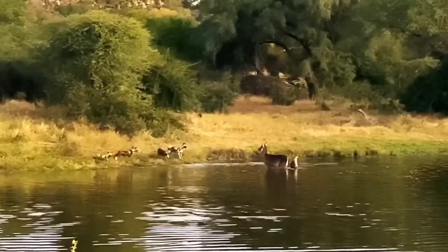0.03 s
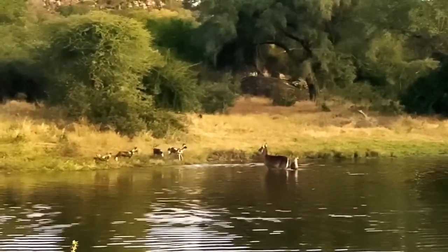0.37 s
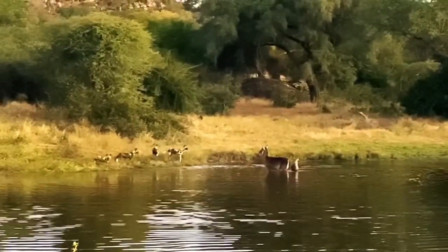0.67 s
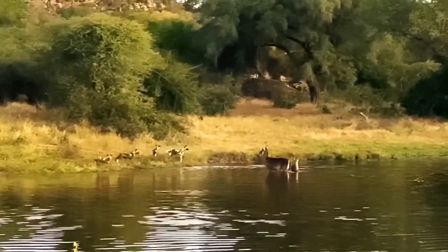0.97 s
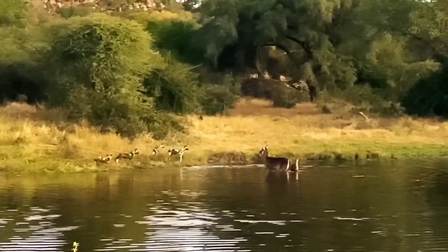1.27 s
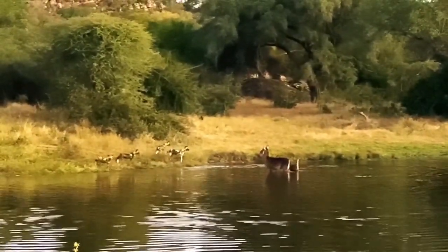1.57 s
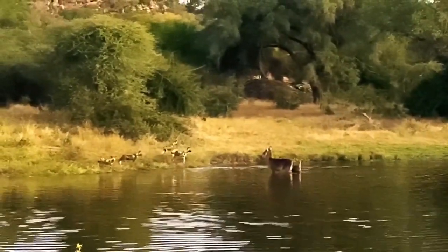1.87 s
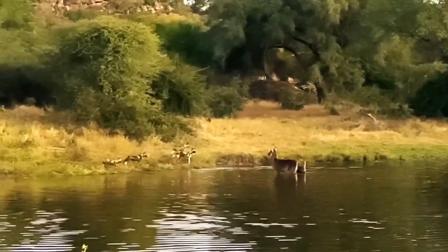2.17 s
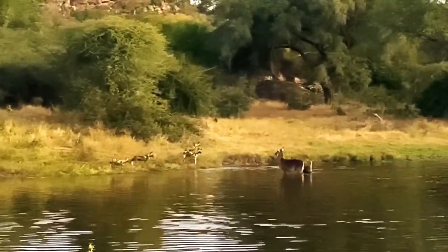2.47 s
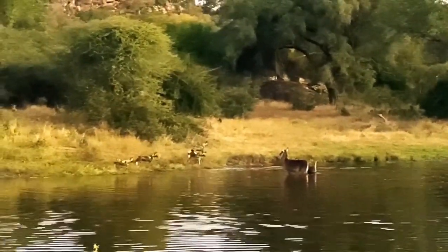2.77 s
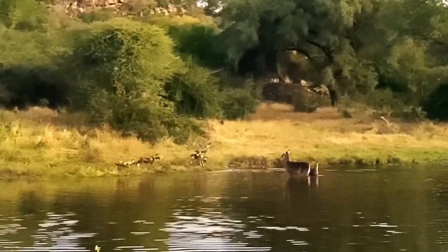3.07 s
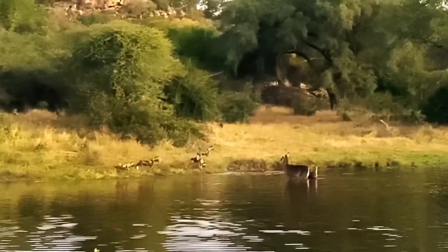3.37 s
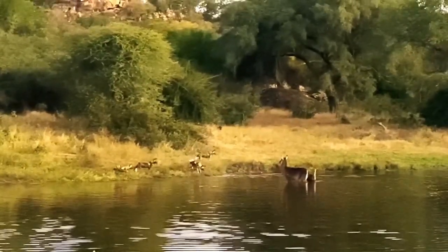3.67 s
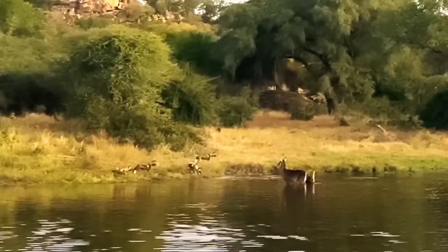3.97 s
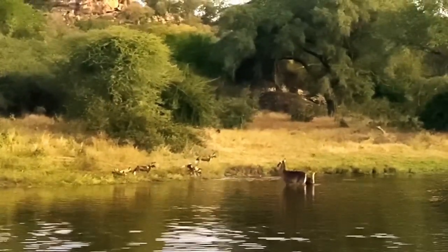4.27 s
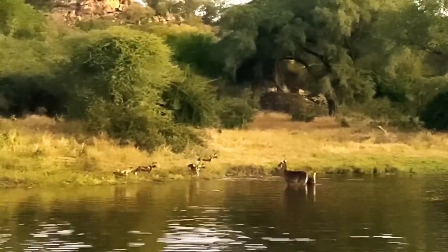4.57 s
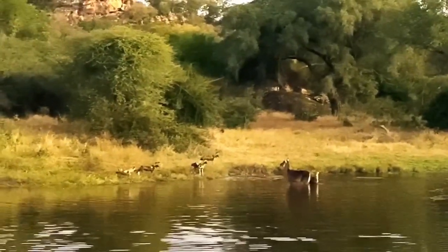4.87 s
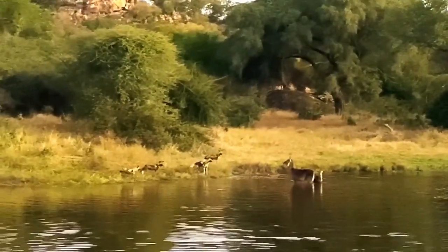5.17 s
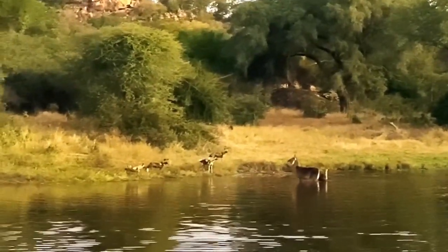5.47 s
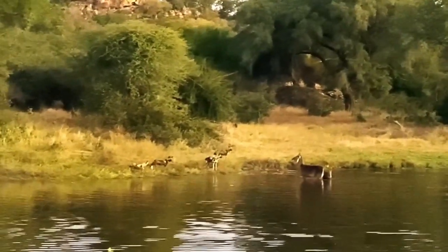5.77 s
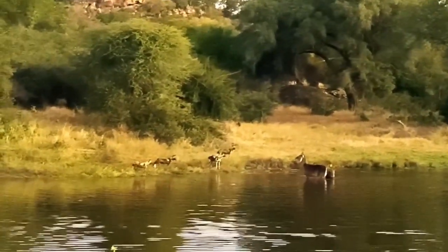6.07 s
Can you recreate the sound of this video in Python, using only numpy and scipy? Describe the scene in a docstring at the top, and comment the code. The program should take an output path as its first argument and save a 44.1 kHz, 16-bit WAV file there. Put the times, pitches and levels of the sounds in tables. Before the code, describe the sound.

Close crickets chirp for the whole six seconds or so, straight ahead on an evening river bank. Each high chirp is a quick run of pulses lasting about a quarter of a second, and they overlap unevenly. A softer cricket chorus forms a steady band behind them.

Everything else is very faint. Lower, slower insect chirps recur in the distance, and a thin, even trill runs from about 1 to 4 seconds. A distant bird gives husky rising whistles between 1.5 and 3 seconds. Raspy bird chatter comes around 3.7 and 6 seconds, with two short pips just after 4. Tiny, very high insect buzzes appear near 1.2 and 5.3 seconds. A low breeze rises slightly around 1.5 seconds, with fine hiss and gently lapping water. Soft knocks and gulps are scattered throughout, clustering near 2.6 seconds. The trees add a slight, short echo.

```python
"""Crickets chirp over one another close to the microphone, on a river bank in the evening.
Each wing stroke is a whistle that falls as the scraper slows along the file; strokes slow as a chirp ends.
Further off are more crickets, lower insects, a thin trill, high buzzes and small birds. A faint breeze
rumbles underneath, with lapping water, a few soft knocks and a short echo from the trees.
Aliasing adds faint ghost copies of the chirps above and below their pitch."""
import sys
import numpy as np
from scipy import signal
from scipy.fft import rfft, irfft, next_fast_len
from scipy.io import wavfile
from scipy.ndimage import map_coordinates

SR = 44100
rng = np.random.default_rng(int(sys.argv[2]) if len(sys.argv) > 2 else 0)


def unload_wav(signal):
    """Save mono or channel-first audio to the path in sys.argv[1] as 16-bit WAV at rate SR, clipped to [-1, 1]."""
    wavfile.write(
        sys.argv[1],
        SR,
        np.round(np.clip(np.atleast_2d(signal).T, -1, 1) * 32767).astype(np.int16),
    )


N = 278989


def add_chirp(track, s, strokes, first_gap_ms, db, spread_hz=30, last_gap_ms=29.25, slowing=1.15):
    """One chirp: the scraper slows along the file, so each stroke falls in pitch; the gaps widen too."""
    # one wing stroke: from_middle_ms, pitch_hz, level_db
    stroke = [(-10.5, 6820, -34), (-8, 6520, -17), (-5.5, 6220, -5.5), (-2.5, 5940, -3), (0, 5710, 0),
              (3.5, 5500, 0.84), (7, 5291, -5.5), (9, 5017, -15), (12.5, 4680, -34)]
    ms, pitch_hz, shape_db = np.transpose(stroke)
    t_ms = np.arange(ms[0], ms[-1], 1000 / SR)
    progress = np.linspace(0, 1, strokes - 1)
    gaps_s = (first_gap_ms + (last_gap_ms - first_gap_ms) * progress ** slowing) / 1000
    onsets = s + ms[0] / 1000 + np.r_[0, np.cumsum(gaps_s)]
    glide_hz = np.interp(t_ms, ms, pitch_hz) + spread_hz * rng.normal()
    for k, at in enumerate(onsets):
        stroke_db = db + 1.24 * rng.normal() - (k == 0)  # the first stroke is 1 dB softer
        # uneven teeth roughen the loudness and pitch
        rough_db = np.interp(t_ms, ms, shape_db) + 1.58 * wobble(700, len(t_ms))
        rough_hz = glide_hz + 45 * wobble(900, len(t_ms))
        add(track, at, amp(stroke_db + rough_db) * tone(rough_hz))


def near_crickets():
    """The crickets closest to the microphone rub their wings in overlapping chirps."""
    # chirps: first_stroke_middle_s, stroke_count, first_gap_ms, level_db
    chirps = [(-0.0654, 9, 26.4, -45.5), (0.1756, 10, 23.0, -42.5), (0.218, 9, 21.6, -45.0),
              (0.303, 13, 25.6, -45.0), (0.5894, 9, 23.2, -44.0), (0.6056, 9, 23.2, -45.0),
              (0.7404, 13, 25.4, -45.5), (0.9884, 9, 22.8, -43.0), (1.026, 10, 22.8, -45.0),
              (1.2524, 14, 26.6, -45.5), (1.396, 7, 22.2, -42.5), (1.4454, 9, 22.6, -44.0),
              (1.7106, 9, 23.0, -43.5), (1.7496, 13, 25.2, -46.0), (1.857, 8, 21.8, -44.0),
              (2.1347, 9, 23.8, -43.5), (2.2004, 14, 25.8, -45.0), (2.518, 10, 23.2, -43.5),
              (2.5388, 12, 22.6, -45.5), (2.7196, 5, 26.0, -45.5), (2.9776, 11, 24.0, -43.0),
              (2.9924, 8, 24.4, -43.0), (3.3438, 13, 23.8, -43.5), (3.3772, 11, 25.2, -46.5),
              (3.7538, 9, 22.8, -45.5), (3.785, 12, 25.6, -46.5), (3.874, 10, 23.0, -44.0),
              (4.1414, 10, 23.4, -44.5), (4.2324, 11, 25.0, -45.5), (4.3152, 8, 22.8, -43.0),
              (4.5665, 9, 23, -45.0), (4.6578, 12, 25.2, -46.0), (4.7328, 10, 23.2, -42.0),
              (4.951, 8, 23.6, -45.5), (5.0968, 11, 25.2, -46.5), (5.2334, 10, 22.2, -43.5),
              (5.3272, 9, 22.6, -45.5), (5.5156, 11, 25.2, -46.0), (5.6684, 8, 26.4, -43.5),
              (5.7472, 20, 25.4, -45.5), (6.031, 10, 23.6, -43.5), (6.1452, 15, 26.2, -45.5)]
    track = np.zeros(N)
    for row in chirps:
        add_chirp(track, *row)
    return track


def far_crickets(count=4, period_s=.6, level_db=-56, blur_db=-64):
    """More of the same kind further off, the furthest blurred into a steady band."""
    # spectrum of the furthest crickets: frequency_hz, relative_db
    chorus = [(3000, -75.5), (4300, -39), (4800, -26.5), (5250, -7.5), (5650, -1.5), (6200, -0.5),
              (6550, -24), (6900, -13.5), (7400, -22.5), (7800, -60)]
    track = np.zeros(N)
    for _ in range(count):
        for s in np.arange(-period_s, N / SR, period_s) + rng.uniform(0, period_s):
            add_chirp(track, s + rng.normal(0, .04), strokes=14, first_gap_ms=23,
                      db=level_db + rng.normal(0, 1.5), spread_hz=90)
    return track + amp(blur_db) * rush(chorus, narrow_db=-17)


def slow_insects(chirp_s=.53, strokes_per_s=17.5, stroke_s=.034, fall_hz=720, rough_hz=50):
    """Distant, lower chirps of well separated, uneven falling strokes, a little softer at each end."""
    # chirps: start_s, pitch_hz, level_db
    chirps = [(.32, 4170, -80), (.72, 3575, -76), (1.45, 4160, -78.5), (1.88, 3600, -76),
              (2.661, 4200, -80), (3.48, 3600, -80), (3.78, 4240, -80), (4.3, 3670, -86.5),
              (4.92, 4150, -81), (4.93, 3575, -79.5), (5.78, 4190, -81)]
    track = np.zeros(N)
    u = np.linspace(0, 1, int(stroke_s * SR))
    for start, hz, db in chirps:
        times = start + np.arange(0, chirp_s, 1 / strokes_per_s)
        swells = np.hanning(len(times) + 2)[1:-1] ** .098
        for s, swell in zip(times, swells):
            glide_hz = hz + fall_hz * (.5 - u) + rough_hz * wobble(500, len(u)) + 35 * rng.normal()
            envelope = amp(db + 1.9 * rng.normal()) * swell * np.sin(np.pi * u) ** 2
            stroke = envelope * tone(glide_hz)
            add(track, s - stroke_s / 2 + .003 * rng.normal(), stroke)
    return track


def thin_trill(start_s=.96, end_s=4.11, ramp_s=.09, pitch_hz=4622, sag_hz_per_s=10, level_db=-72.5):
    """A tree cricket trills evenly; it sounds softer and flat while its effort builds and dies away."""
    t = np.arange(N) / SR
    effort = np.clip(np.minimum(t - start_s, end_s - t) / ramp_s, 0, 1)
    centre_hz = pitch_hz - sag_hz_per_s * (t - start_s) - 220 * (1 - effort)
    strokes_per_s = 32.5 + .19 * wobble(3.7)
    stroke_phase = np.cumsum(strokes_per_s) / SR % 1
    glide_hz = centre_hz + 170 * (.5 - stroke_phase) + 12 * wobble(200)  # each stroke falls and wavers
    return amp(level_db) * np.sqrt(effort) * np.sin(np.pi * stroke_phase) ** 2 * tone(glide_hz)


def bird_note(length_s, hz, slide_hz, db, arch_hz=0, rasp_hz=0):
    """One bird note that swells and fades while its pitch slides, arches and shakes."""
    u = np.linspace(0, 1, int(length_s * SR))
    swell = np.sin(np.pi * u)
    return amp(db) * swell * tone(hz + slide_hz * u + arch_hz * swell + rasp_hz * wobble(600, len(u)))


def birds():
    """Small birds in the distance give husky rising whistles, short arched pips and raspy chatter."""
    # one bird's repeated whistle: start_s, level_db
    whistles = [(1.506, -81.5), (1.96, -79.5), (2.75, -81), (3.13, -90)]
    # pips: start_s, pitch_hz, level_db
    pips = [(4.13, 2160, -76.5), (4.332, 2286, -68)]
    # chatter notes: start_s, length_s, pitch_hz, slide_hz, level_db
    chatter = [(0.026, 0.033, 3090, -1, -73), (3.617, .1, 3410, -250, -73), (3.73, 0.11, 3360, -400, -75),
               (3.798, 0.11, 3230, 496, -76.5), (5.77, .08, 3820, -300, -80),
               (6.03, 0.093, 3770, -330, -80), (6.18, .1, 3800, -380, -76.5)]
    track = np.zeros(N)
    for s, db in whistles:
        add(track, s, bird_note(length_s=.18, hz=3060, slide_hz=1120, db=db, rasp_hz=150))
    for s, hz, db in pips:
        add(track, s, bird_note(length_s=.038, hz=hz, slide_hz=0, db=db, arch_hz=145, rasp_hz=25))
    for s, *note in chatter:
        add(track, s, bird_note(*note, rasp_hz=218))
    return track


def knocks():
    """Soft knocks close by, each a quick slide in pitch, mostly downwards; the lower, the longer."""
    # knocks, ticks and gulps: start_s, first_hz, last_hz, level_db
    slides = [(.274, 700, 327, -70.5), (1.635, 132, 59.94, -73), (2.028, 387, 110, -67.5),
              (2.593, 472, 400, -72.5), (2.647, 1320, 196, -70.5), (2.652, 148, 60, -67.5),
              (2.67, 387, 60, -64), (2.79, 1650, 1140, -72), (3.25, 220, 70, -67.5), (4.43, 380, 430, -74),
              (4.658, 1600, 297, -69.5), (5.595, 386, 69, -68), (5.85, 150, 79, -67.5),
              (6.019, 1374, 258, -70.5)]
    track = np.zeros(N)
    for s, first_hz, last_hz, db in slides:
        length_s = .024 * (400 / first_hz) ** .55
        u = np.linspace(0, 1, int(length_s * SR))
        glide_hz = first_hz * (last_hz / first_hz) ** u
        add(track, s, amp(db) * np.sin(np.pi * u) * tone(glide_hz))
    return track


def high_buzzes(strokes_per_s=55):
    """A small insect rasps in short bursts, pitched far above the crickets."""
    # bursts: start_s, length_s, level_db
    bursts = [(1.19, 0.35, -88), (4.478, 0.044, -91), (5.27, .13, -88), (5.576, .06, -88)]
    # spectrum of the rasp: frequency_hz, relative_db
    band = [(11000, -39.5), (12300, -6), (13000, -3), (13600, -3), (14800, -26.5)]
    effort = np.zeros(N)
    for s, length_s, db in bursts:
        add(effort, s, amp(db) * signal.windows.tukey(int(length_s * SR), .4))
    strokes = unit(np.sin(np.pi * strokes_per_s * np.arange(N) / SR) ** 2)
    return effort * strokes * rush(band, narrow_db=-3)


def breeze_and_water(water_db=-84, water_follows=.4, ripple_db=1.16, hiss_db=-83):
    """A breeze rises, rumbles and stirs the river, which laps in small waves; a fine hiss lies over it."""
    # strength of the breeze's rumble: time_s, level_db
    breeze = [(0.0, -78.5), (0.12, -87), (1.11, -86), (1.64, -77.5), (6.2, -78), (6.33, -80.5)]
    # small waves: crest_s, length_s, rise_db
    waves = [(1.95, 0.78, 5), (2.62, .3, 4), (4.55, 0.5, 7)]
    # spectrum of the breeze: frequency_hz, relative_db
    rumble = [(15, -40), (25, -17.5), (40, -7), (59, 2.5), (85, -3), (130, -7), (220, -14.5), (300, -43)]
    # spectrum of the lapping: frequency_hz, relative_db
    water = [(100, -14), (190, 0), (300, -0.5), (500, -5), (800, -13), (1200, -19.5), (2500, -21.5),
             (5000, -61)]
    # spectrum of the hiss: frequency_hz, relative_db
    hiss = [(100, -8), (600, 3), (1300, -3), (2000, 3), (2900, -8), (4000, -0.5), (7000, -6.5), (8000, -16),
            (12500, -12), (14500, -23.5), (16000, -27.5)]
    breeze_db = np.interp(np.arange(N) / SR, *np.transpose(breeze))
    lapping_db = water_db + water_follows * (breeze_db - breeze_db.mean()) + ripple_db * wobble(14)
    for crest_s, length_s, rise_db in waves:
        add(lapping_db, crest_s - length_s / 2, rise_db * np.hanning(int(length_s * SR)))
    return amp(breeze_db) * rush(rumble) + amp(lapping_db) * rush(water) + amp(hiss_db) * rush(hiss)


def tree_echo(x, t60_s=.18, side_db=-5):
    """Trees along the bank scatter a short stereo echo back to the microphone."""
    t = np.arange(SR // 2) / SR
    tail = rng.standard_normal((2, len(t))) * amp(-60 * t / t60_s)
    mid, side = signal.fftconvolve(x[None], tail / np.linalg.norm(tail[0]), axes=1)[:, :N]
    return np.array([mid + amp(side_db) * side, mid - amp(side_db) * side])


def rush(spectrum, narrow_db=0):
    """Stereo noise of rms 1 with the given spectrum; a negative narrow_db draws it to the middle."""
    # stereo width of the air: frequency_hz, side_minus_mid_db
    width = [(25, -19), (60, -9), (250, -10), (600, -10.5), (1200, -0.5), (2500, -10.5), (6000, -10.5),
             (12000, -14.5)]

    def mid_side_gains(hz):
        mid_db = along(spectrum, hz)
        return amp([mid_db, mid_db + along(width, hz) + narrow_db])

    mid, side = filtered(rng.standard_normal((2, N)), mid_side_gains)
    return unit(np.array([mid + side, mid - side]))


def amp(db):
    """Decibels to gain."""
    return 10 ** (np.asarray(db) / 20)


def unit(x):
    """Scale to rms 1."""
    return x / np.sqrt(np.mean(x ** 2) + 1e-20)


def wobble(rate, size=N):
    """A smooth random curve, rate knots a second."""
    knots = rng.standard_normal(int(size * rate / SR) + 4)
    return map_coordinates(knots, [np.arange(size) * rate / SR])


def tone(hz):
    """A sine that follows a pitch curve from a random phase."""
    return np.sin(2 * np.pi * (np.cumsum(hz) / SR + rng.random()))


def along(points, hz):
    """Interpolate (frequency_hz, value) points on a log frequency axis."""
    point_hz, values = np.transpose(points)
    return np.interp(np.log(hz + 1), np.log(point_hz), values)


def filtered(x, response):
    """Filter x by the gain response(hz)."""
    size = next_fast_len(N + SR // 2)
    return irfft(rfft(x, size) * response(np.fft.rfftfreq(size, 1 / SR)), size)[..., :N]


def add(track, s, sound):
    """Mix a sound into a track from time s on."""
    i = round(s * SR)
    lo, hi = max(i, 0), min(i + len(sound), N)
    if hi > lo:
        track[lo:hi] += sound[lo - i:hi - i]


def scene():
    """Crickets straight ahead of the microphone; the distant slow insects get the largest share of echo."""
    near, insects, trill = near_crickets(), slow_insects(), thin_trill()
    birds_and_knocks = birds() + knocks()
    echo = tree_echo(amp(-20.5) * near + amp(-1.5) * insects + amp(-11) * trill
                     + amp(-10) * birds_and_knocks)
    return (near + far_crickets() + insects + trill + birds_and_knocks + echo
            + high_buzzes() + breeze_and_water())


def record(dry, alias_shift_hz=3900, top_hz=15760):
    """Aliasing adds faint ghost copies of the chirps above and below their pitch; the top treble is cut."""
    # how strongly each pitch is aliased: frequency_hz, gain_db
    alias_gain = [(3000, -4), (5300, 1.5), (5700, 2), (6300, 5), (6800, 9), (8000, -13)]
    alias_shift = np.exp(2j * np.pi * alias_shift_hz * np.arange(N) / SR)
    # one copy below, two above
    ghosts = amp(-37) / alias_shift + amp(-41) * alias_shift + amp(-47) * alias_shift ** 2
    weighted = filtered(dry, lambda hz: amp(np.interp(hz, *np.transpose(alias_gain))))
    analytic = signal.hilbert(weighted, next_fast_len(N))[:, :N]
    return filtered(dry + np.real(analytic * ghosts), lambda hz: hz < top_hz)


dry = scene()
out = record(dry)
unload_wav(out)
```